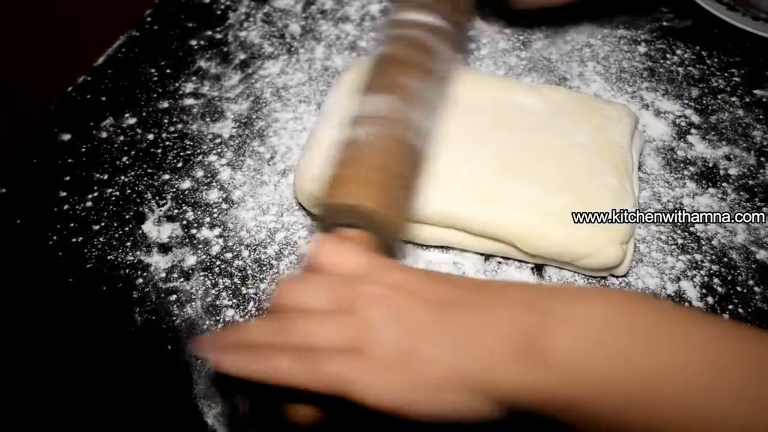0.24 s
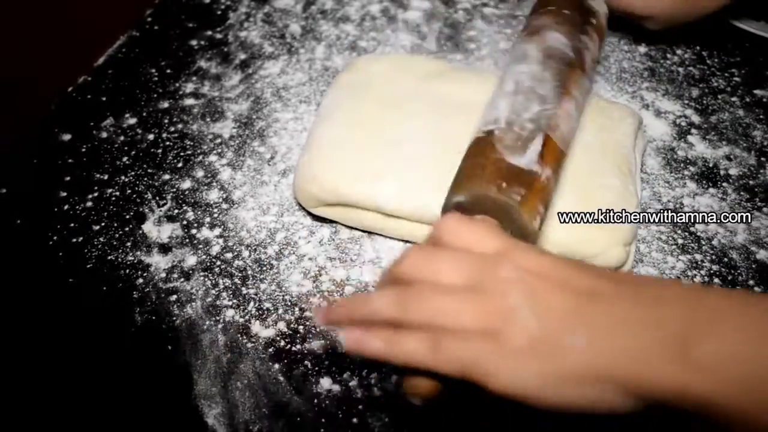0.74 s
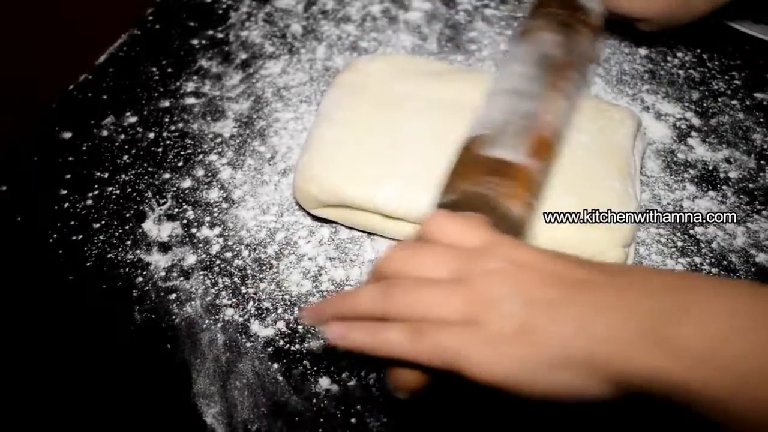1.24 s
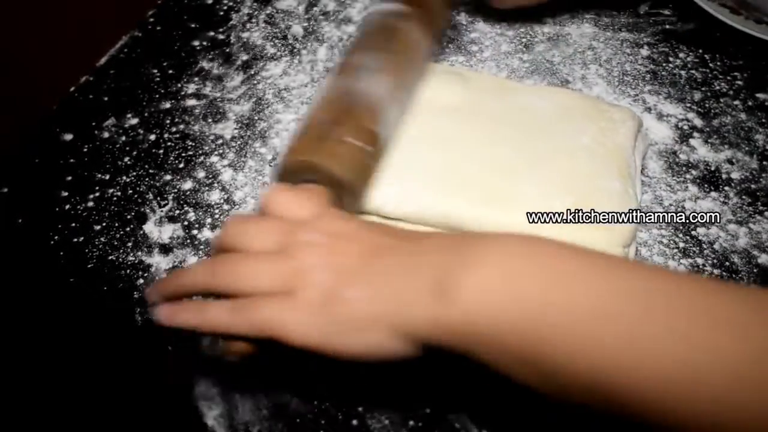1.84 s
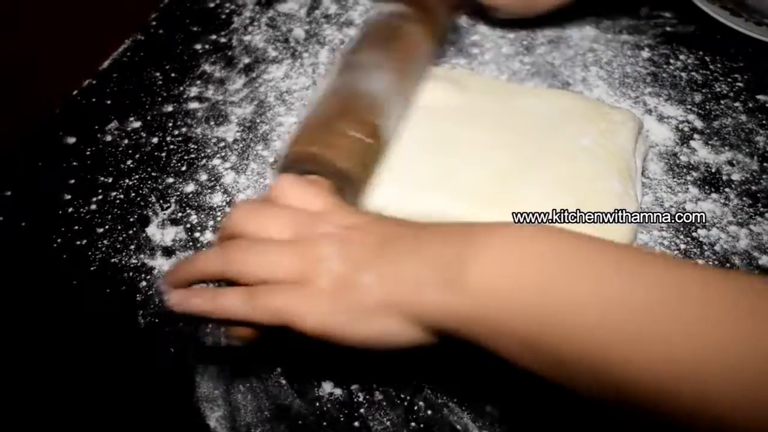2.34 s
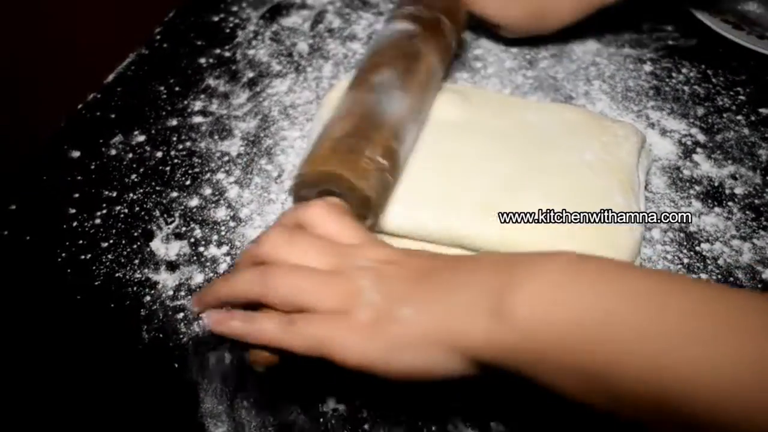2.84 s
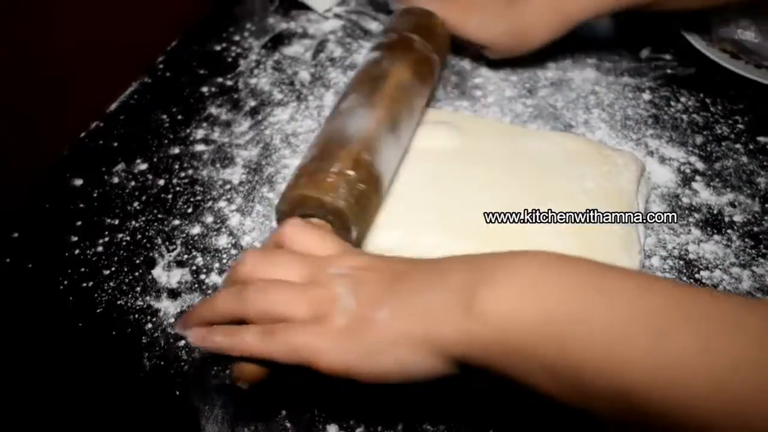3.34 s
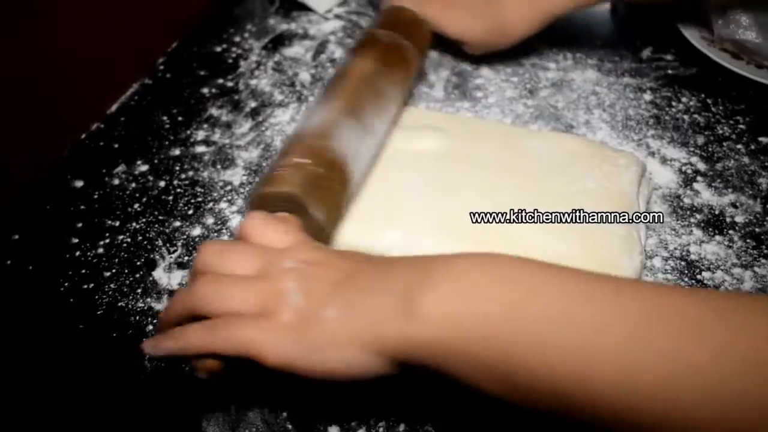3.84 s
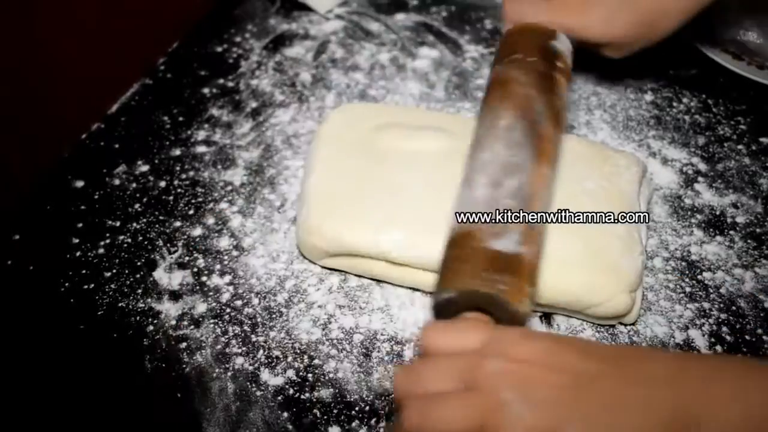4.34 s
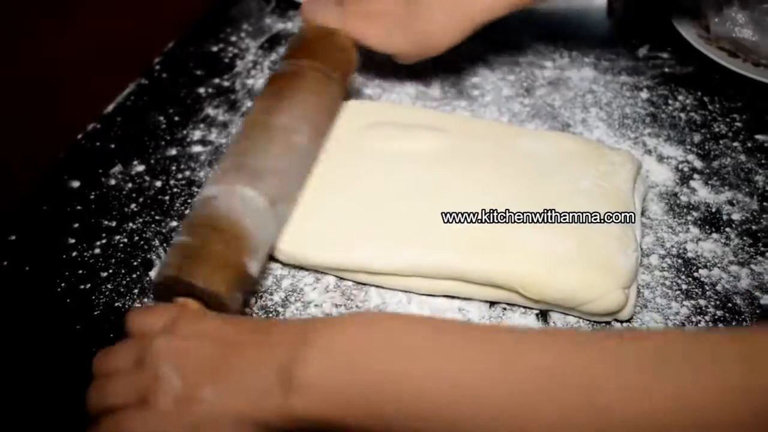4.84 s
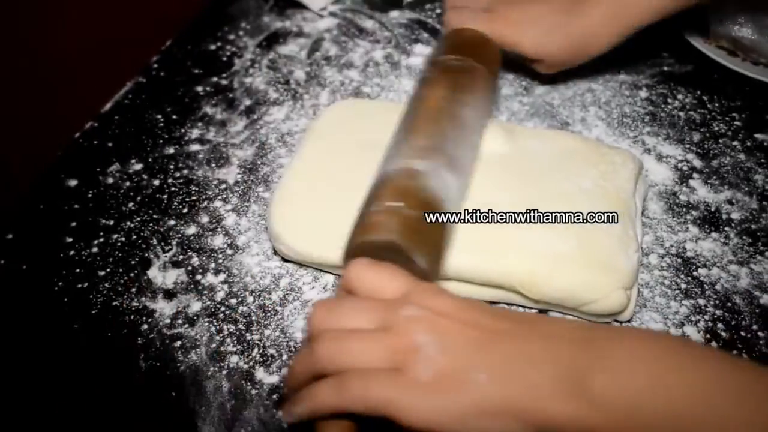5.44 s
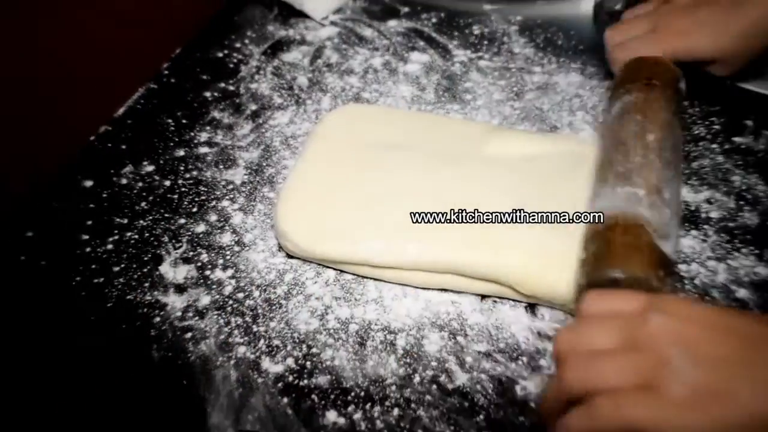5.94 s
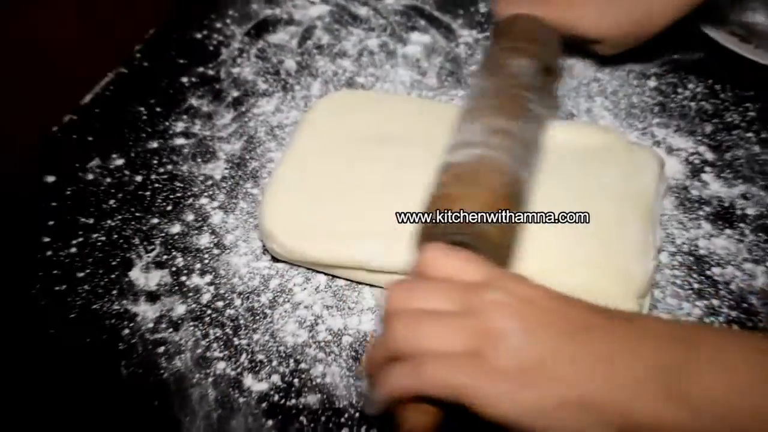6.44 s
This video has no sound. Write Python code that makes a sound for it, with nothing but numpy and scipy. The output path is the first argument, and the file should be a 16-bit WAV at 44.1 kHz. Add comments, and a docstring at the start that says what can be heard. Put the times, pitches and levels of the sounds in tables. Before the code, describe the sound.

Close to a floured worktop, barely audible, hissy wooden strokes pass quickly to and fro over pastry, with small dry ticks from the pin's axle. They fade, then two far louder wooden clacks burst out just under a second apart, bright and hard, each a tight rattle of rebounds with a short room tail. A few slow, faint rolls and a soft bump end it, over constant low hum and airy fan noise.

```python
"""A wooden rolling pin runs to and fro over floured pastry in a quiet kitchen: grainy noise swells with each stroke.
Its axle ticks and rubs as short damped modes and narrow noise, and soft bumps sound the worktop's modes.
Twice the pin comes down hard on the worktop: a chattering clack of wood modes and contact noise rings in the room.
An appliance hums faintly throughout, as narrow noise bands over soft air noise."""
import sys
import numpy as np
from scipy import signal
from scipy.fft import rfft, irfft, next_fast_len
from scipy.io import wavfile
from scipy.ndimage import uniform_filter1d, minimum_filter1d, map_coordinates

SR = 44100
rng = np.random.default_rng(int(sys.argv[2]) if len(sys.argv) > 2 else 0)


def to_wav(s):
    """Save 16-bit WAV."""
    ch = np.atleast_2d(s).T  # columns
    pcm = np.round(np.clip(ch, -1, 1) * 32767)  # PCM
    wavfile.write(sys.argv[1], SR, pcm.astype(np.int16))


N = 295716
TIME = np.arange(N) / SR  # the whole scene, in seconds
RING = np.arange(SR // 4) / SR  # the quarter second given to each short sound

# appliance hum and the bands of its fan: (centre [Hz], half-width [Hz], level [dB rms])
HUM_BANDS = [(49.93, 10, -80), (101, 13, -72.5), (153.5, 12, -71), (512, 20, -78), (667, 63, -72.5),
             (900, 42, -70), (975, 80, -69.5), (5540, 350, -76), (5970, 330, -72.5), (6650, 180, -79.5)]
# colour of the kitchen's steady air noise: (frequency [Hz], relative level [dB per Hz])
AIR_COLOUR = [(20, -27), (55, -8), (120, -11), (210, -10.5), (310, 1.5), (650, -5), (800, -9), (1050, -4.5),
              (1300, -10), (2600, -15), (3300, -22), (8000, -23), (11000, -30), (15500, -32)]
# strokes, to and fro about four times a second, then slower: (time of full speed [s], level [dB], length [s])
STROKES = [(0.087, -72, 0.23), (0.327, -68.5, 0.2), (0.501, -67, 0.17), (0.724, -66, 0.15),
           (.91, -74, 0.25), (1.15, -70, 0.2), (1.378, -67.5, 0.2), (1.639, -68, 0.18),
           (1.848, -68.5, 0.21), (2.131, -68.5, 0.2), (2.354, -63.5, 0.2), (2.635, -70.5, 0.19),
           (2.838, -73.5, 0.18), (3.05, -76, 0.17), (3.26, -75.5, 0.32), (3.52, -76.5, 0.18),
           (3.793, -76, 0.35), (4.63, -72, .55), (5.68, -77.5, 0.33), (6.53, -76, .33)]
# colour of the floury swish: (frequency [Hz], relative level [dB per Hz])
SWISH_COLOUR = [(300, -6), (1200, -6), (2500, 0), (4000, -3), (6500, -4.5), (8000, 2), (9300, 0.5),
                (10200, -5), (11200, -16), (15000, -24.5)]
# small ticks of the axle: (time [s], relative level [dB], centre of the excited band [Hz])
TICKS = [(.360, -61, 8000), (1.873, -50, 3150), (1.876, -51, 3850), (2.3857, -50, 2740), (2.387, -46, 9000),
         (3.309, -50, 3520), (3.3135, -52, 4660), (3.8328, -52.5, 4000), (3.845, -54, 3730),
         (5.579, -63, 3600)]
# modes of the axle and handles: (frequency [Hz], relative level [dB], t60 [s])
AXLE_MODES = [(2550, -4, .03), (3190, -1, .035), (3450, 0, .03), (3800, -1, .035), (4620, 0, .03),
              (8400, -4, .012), (9300, -4, .012)]
# soft bumps of the pin on the worktop, during or after a stroke:
# (time [s], relative level [dB], brightness [dB per octave], rise time constant [s])
BUMPS = [(1.877, -57, -2, 0.0017), (2.387, -59, -11, .001), (4.007, -46, 2, .0015),
         (5.98, -44.5, -14, 0.0028)]
# modes of the worktop left to ring freely: (frequency [Hz], relative level [dB], t60 [s])
WORKTOP_MODES = [(415, 0, .12), (490, -7, .09), (635, -4, .08), (905, -8, .07), (1140, 0, .05),
                 (1260, -9, .05), (2250, -13, .05), (2520, -5, .06)]
# the axle rubs and makes the barrel sing: (time of the peak [s], level [dB], spread to either side [s])
RUBS = [(1.658, -61, 0.019), (1.87, -69.5, 0.06), (2.834, -66, 0.039), (6.348, -64, 0.016)]
# the pin chatters on the worktop, one list of contacts for each clack:
# (time [s], relative level [dB], brightness [dB per octave])
CLACK_CONTACTS = [
    [(4.3343, -2, 3.6), (4.33676, -12, -1.1), (4.3382, -22, 4.2), (4.3406, -7, 4), (4.34879, -13, -3.7)],
    [(5.2215, -7, 1.6), (5.22435, -10, 1.6), (5.22879, -5, -4), (5.23549, -8, -2.4), (5.23917, -16, 3.2),
     (5.24294, -14, -1.9), (5.24612, -21, .4)],
]
# how each clack lands: (strength [dB], worktop knock [dB], contact noise [dB],
# bottom of the blow's spectrum [Hz], top of the blow's spectrum [Hz])
LANDINGS = [(2.8, -29, -14.5, 680, 14000), (1.5, -18.5, -12.5, 588, 10400)]
# modes of the pin, which lands on a different spot each time:
# (frequency [Hz], t60 [s], relative level in the first clack [dB], relative level in the second [dB])
PIN_MODES = [(1229.5, 0.036, -28, -26), (1468, 0.055, -22, -27.5), (1928, 0.036, -23, -21.5),
             (2083, 0.026, -22, -26.5), (2220, 0.039, -26, -31.5), (2422, 0.034, -13, -9),
             (2559, 0.034, -3, 1), (2680, 0.032, -16, -20.5), (2790, 0.058, -14, -17),
             (3109, .04, -22.5, -14.5), (3700, 0.035, -19.5, -26.5), (4110, 0.047, -11.5, -35.5),
             (4320, 0.026, -4, -4.5), (4450, .025, -28.5, -27.5), (5166, 0.049, -14, -13),
             (5260, 0.03, -16.5, -23.5), (5820, .04, -27, -18.5), (6100, 0.024, -14.5, -26),
             (7060, .03, -22, -25), (7490, .033, -24, -17), (8514, .035, -31.5, -26),
             (10500, 0.027, -39, -44)]
# colour of the contact noise: (frequency [Hz], relative level [dB])
CRACK_COLOUR = [(200, -46.5), (600, -19), (950, -16), (1250, 6.5), (2500, 5.5), (3600, -1), (6000, -0.5),
                (9200, -6), (11000, -20), (16000, -29)]
# how long the room rings: (frequency [Hz], t60 [s])
ROOM_DECAY = [(200, 0.19), (1200, .42), (2500, 0.57), (4500, 0.42), (8000, 0.31), (14000, 0.11)]

SPEED_UP_SHARE = .42  # part of a stroke spent gathering speed
SWISH_GROWS = 1.7  # the swish follows the pin's speed to this power
SING_HZ, SING_WIDTH_HZ, SING_WANDER_HZ = 9300, 430, 130  # friction hiss on the strongest stroke
TOP_HZ = 16100  # band limit


def amp(db):
    """Decibels to gain."""
    return 10 ** (np.asarray(db) / 20)


def unit(x):
    """Scale to rms 1."""
    return x / np.sqrt(np.mean(x ** 2) + 1e-20)


def along(points, hz):
    """Read (Hz, value) points on a log frequency axis."""
    f, v = np.transpose(points)
    return np.interp(np.log(hz + 1), np.log(f + 1), v)


def filtered(x, response):
    """Shape x by a response of frequency."""
    size = next_fast_len(len(x) + 8192)
    gain = response(np.fft.rfftfreq(size, 1 / SR))
    return irfft(rfft(x, size) * gain, size)[:len(x)]


def noise(response, size=N):
    """Coloured noise of rms 1."""
    return unit(filtered(rng.standard_normal(size), response))


def band(centre_hz, half_width_hz):
    """The response of a resonance, half as high at half_width_hz from its centre."""
    return lambda hz: 1 / (1 + ((hz - centre_hz) / half_width_hz) ** 2)


def wobble(rate):
    """A smooth random curve, rate knots a second."""
    knots = rng.standard_normal(int(N * rate / SR) + 4)
    return map_coordinates(knots, [TIME * rate])


def add(track, s, sound):
    """Mix a sound into the track at time s."""
    part = track[round(s * SR):][:len(sound)]
    part += sound[:len(part)]


def decay(t60):
    """An envelope that falls 60 dB in t60 seconds."""
    return np.exp(-np.log(1000) * RING / t60)


def onset(rise_s):
    """An envelope that softens the start of a contact."""
    return 1 - np.exp(-RING / rise_s)


def blow(tilt_db, pivot_hz, top_hz):
    """The spectrum of a contact: the harder it is, the brighter and the higher it reaches."""
    return lambda hz: amp(tilt_db * np.log2((hz + 100) / pivot_hz)) / np.sqrt(1 + (hz / top_hz) ** 12)


def ring(modes, colour, scatter_db):
    """Damped modes after one blow; the grip changes their strengths a little each time."""
    hz, db, t60 = np.transpose(modes)[:, :, None]
    gain = amp(db + scatter_db * rng.standard_normal(hz.shape)) * colour(hz)
    return np.sum(gain * decay(t60) * np.sin(2 * np.pi * hz * RING), axis=0)


def burst(response, t60):
    """A puff of noise that dies away."""
    return noise(response, size=len(RING)) * decay(t60)


def room_answer(x, build_s):
    """The room's answer swells as it builds up; each frequency dies at its own speed."""
    hz, t, z = signal.stft(rng.standard_normal(SR), SR, nperseg=256)
    fade = np.exp(-np.log(1000) * t / along(ROOM_DECAY, hz)[:, None])
    tail = signal.istft(z * fade, SR, nperseg=256)[1]
    tail = tail * (1 - np.exp(-np.arange(len(tail)) / SR / build_s))
    return signal.fftconvolve(x, tail / np.linalg.norm(tail))[:N]


def appliance(air_db):
    """A wavering hum and a fan's narrow bands over soft air noise."""
    hum = sum(amp(db) * noise(band(hz, width)) for hz, width, db in HUM_BANDS)
    air = noise(lambda hz: amp(along(AIR_COLOUR, hz)))
    return hum + amp(air_db) * air


def speed(s, length):
    """One stroke: the pin gathers speed until time s, then slows to rest (0-1)."""
    share = np.where(TIME < s, SPEED_UP_SHARE, 1 - SPEED_UP_SHARE)
    return np.abs(np.cos(np.pi / 2 * np.clip((TIME - s) / (share * length), -1, 1)))


def rolling(swish_db, sing_db, barrel_db, grain_db, rise_hz, rest_db, uneven_db):
    """Floury wood slides under the palms: a grainy swish on each stroke that also stirs the barrel's main mode."""
    strokes = sum(amp(db) * speed(s, length) ** SWISH_GROWS for s, db, length in STROKES)
    # the hands are never quite still or even
    stroke_db = 20 * np.log10(strokes + amp(rest_db)) + uneven_db * wobble(35)
    grain = amp(grain_db * wobble(700))
    flour = unit(noise(lambda hz: amp(along(SWISH_COLOUR, hz))) * grain)
    # a band of friction hiss whose pitch climbs rise_hz for each dB of the stroke
    strongest_db = max(db for s, db, length in STROKES)
    sing_hz = SING_HZ + rise_hz * (stroke_db - strongest_db) + SING_WANDER_HZ * wobble(12)
    carrier = np.cos(2 * np.pi * np.cumsum(sing_hz) / SR)
    sing = unit(noise(band(0, SING_WIDTH_HZ)) * carrier)
    barrel = noise(band(2500, 90))
    return amp(stroke_db) * (amp(swish_db) * flour + amp(sing_db) * sing + amp(barrel_db) * barrel)


def handling(attack_s):
    """Axle ticks ring damped modes, brief rubs sing in a narrow band, and dough cushions the bumps."""
    out = np.zeros(N)
    for s, db, pitch_hz in TICKS:
        tick = ring(AXLE_MODES, band(pitch_hz, .11 * pitch_hz), scatter_db=3.0)
        add(out, s, amp(db) * tick * onset(attack_s))
    for s, db, tilt_db, rise_s in BUMPS:
        thud = ring(WORKTOP_MODES, blow(tilt_db, pivot_hz=507, top_hz=4000), scatter_db=0.5)
        add(out, s, amp(db) * thud * onset(rise_s))
    rubbing = sum(amp(db) * np.exp(-2 * ((TIME - s) / spread) ** 2) for s, db, spread in RUBS)
    return out + rubbing * noise(band(2470, 56))


def clack(contacts, landing, modes, crack_t60, snap_db, attack_s, room_db):
    """Wood hits the worktop and rebounds a few times within 25 ms, sounding pin, worktop and room."""
    strength_db, knock_db, crack_db, low_hz, top_hz = landing
    pin, slab = np.zeros((2, N))
    for s, db, tilt_db in contacts:
        colour = blow(tilt_db, pivot_hz=3000, top_hz=top_hz)
        crack = burst(lambda hz: amp(along(CRACK_COLOUR, hz)) * colour(hz), crack_t60)
        # the treble of the contact dies at once
        snap = burst(lambda hz: colour(hz) * (hz > top_hz / 4), t60=0.0082)
        contact_noise = crack + amp(snap_db) * snap
        wood = ring(modes, colour, scatter_db=1.5) + amp(crack_db) * contact_noise
        add(pin, s, amp(db + strength_db) * wood * onset(attack_s))
    # the first blow knocks the worktop, and the pin pressing on it damps the knock
    knock = ring(WORKTOP_MODES, blow(11, pivot_hz=1250, top_hz=1500), scatter_db=1) * np.exp(-RING / .03)
    first_s = contacts[0][0]
    add(slab, first_s, amp(knock_db) * knock * onset(.003) ** 2)
    # the slim barrel radiates little bass, and a softer landing rounds off the edges
    edges = [low_hz, min(1.1 * top_hz, SR / 2 - 1000)]
    barrel_filter = signal.butter(5, edges, "bandpass", fs=SR, output="sos")
    direct = slab + signal.sosfilt(barrel_filter, pin)
    return direct + amp(room_db) * room_answer(direct, build_s=0.0085)


def scene():
    """The pin at work in the humming kitchen."""
    hum = appliance(air_db=-63.5)
    work = rolling(swish_db=-2.0, sing_db=-5.0, barrel_db=-7, grain_db=1.0,
                   rise_hz=40, rest_db=-89, uneven_db=1.06)
    work = work + handling(attack_s=0.00056)
    work_in_room = work + amp(-15.0) * room_answer(work, build_s=.01)
    hz, t60, *spots = np.transpose(PIN_MODES)
    clacks = np.zeros(N)
    for contacts, landing, db in zip(CLACK_CONTACTS, LANDINGS, spots):
        modes = np.transpose([hz, db, t60])
        clacks += clack(contacts, landing, modes, crack_t60=.026, snap_db=-3, attack_s=0.00081, room_db=-16.0)
    return (clacks + work_in_room + hum)[None]


def record(dry):
    """A fast limiter holds down the loudest peaks; nothing passes above the band limit."""
    top = .93  # limiter threshold, of full scale
    needed = top / np.maximum(np.abs(dry), top)
    limited = dry * uniform_filter1d(minimum_filter1d(needed, size=21), size=17)

    def band_limit(hz):
        """Fade to silence over the last 300 Hz."""
        return np.clip((TOP_HZ - hz) / 300, 0, 1)
    return np.array([filtered(channel, band_limit) for channel in limited])


dry = scene()
out = record(dry)
to_wav(out)
```